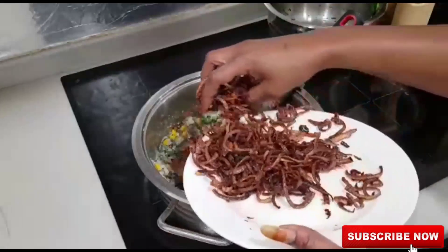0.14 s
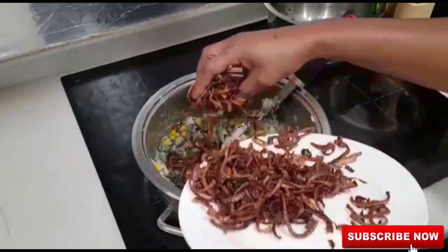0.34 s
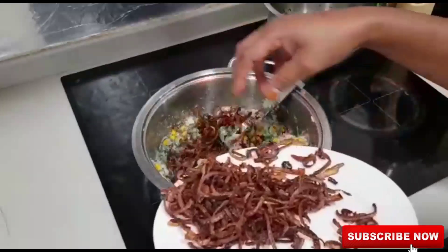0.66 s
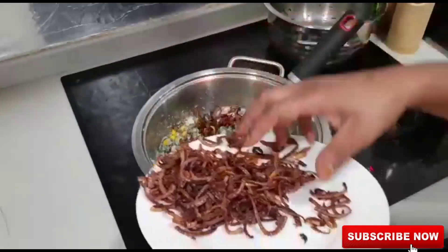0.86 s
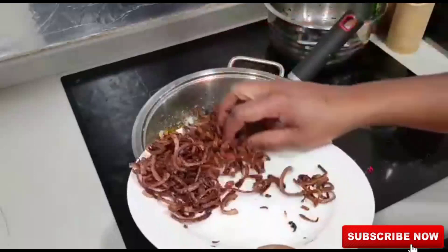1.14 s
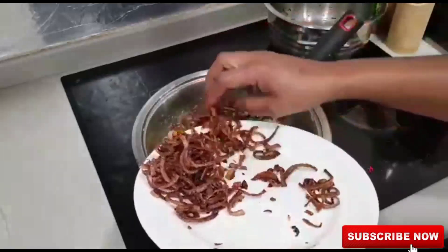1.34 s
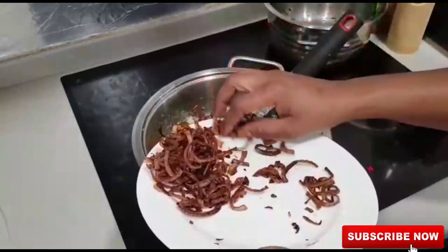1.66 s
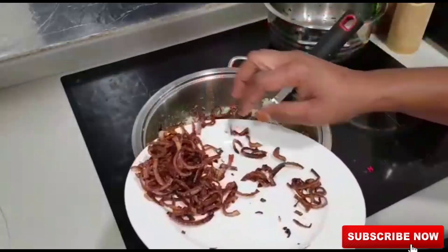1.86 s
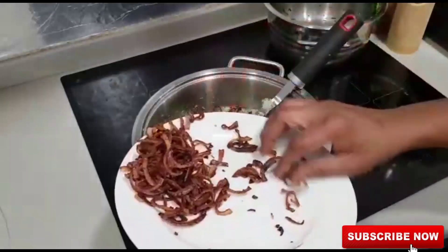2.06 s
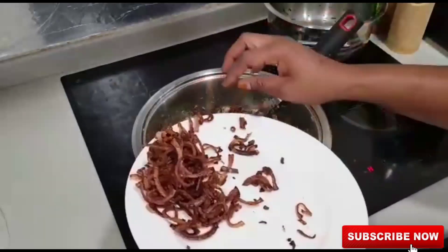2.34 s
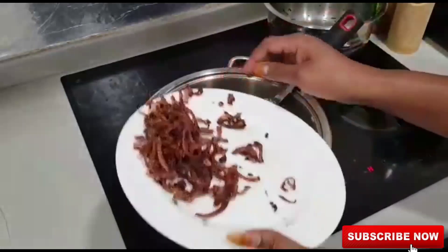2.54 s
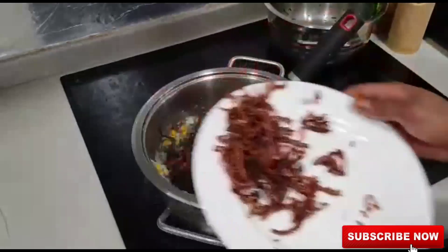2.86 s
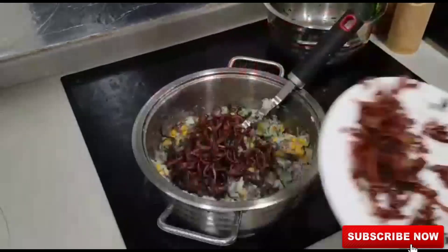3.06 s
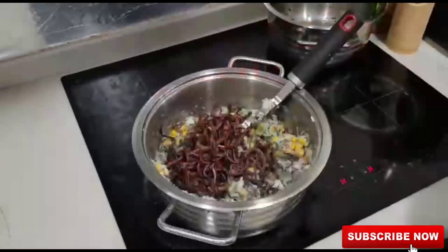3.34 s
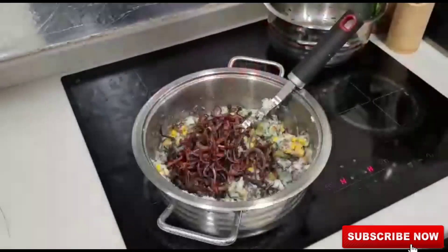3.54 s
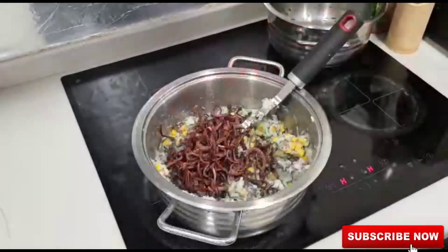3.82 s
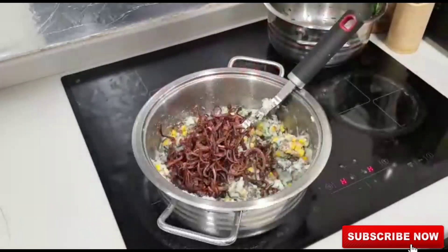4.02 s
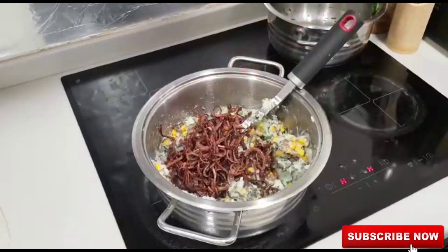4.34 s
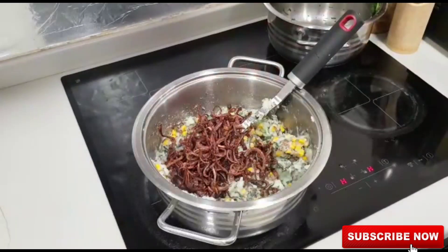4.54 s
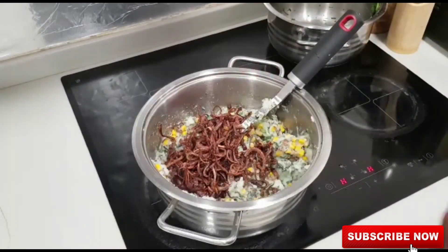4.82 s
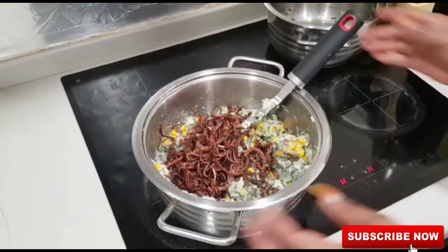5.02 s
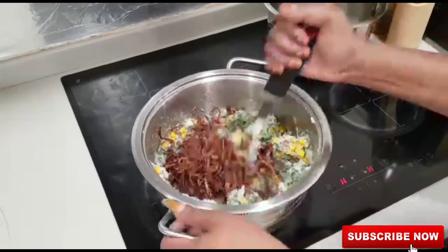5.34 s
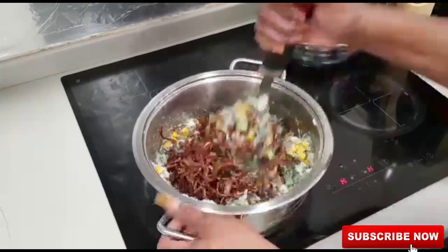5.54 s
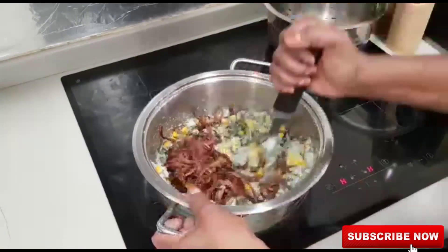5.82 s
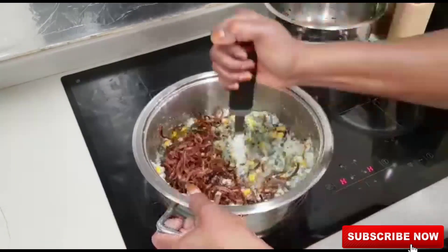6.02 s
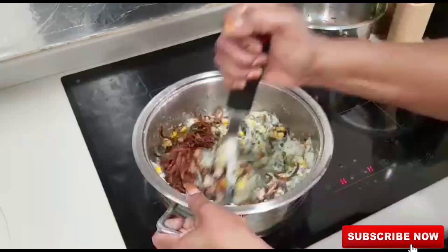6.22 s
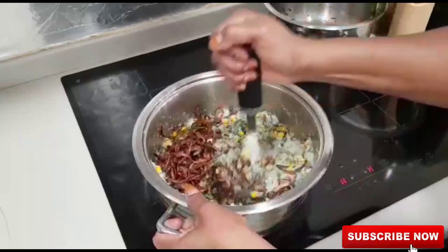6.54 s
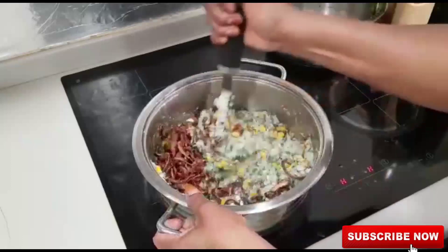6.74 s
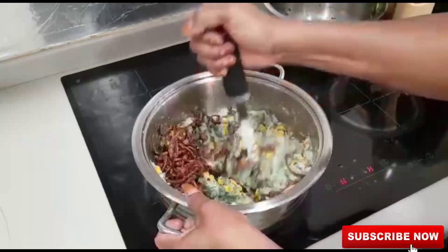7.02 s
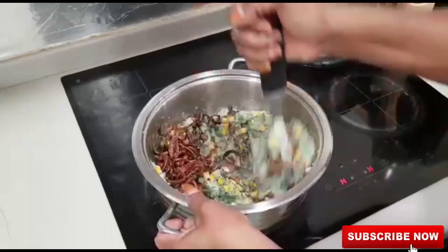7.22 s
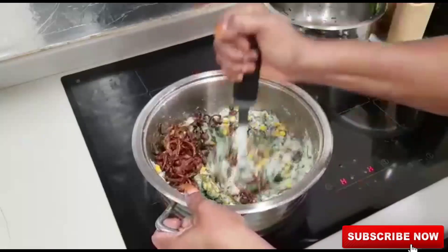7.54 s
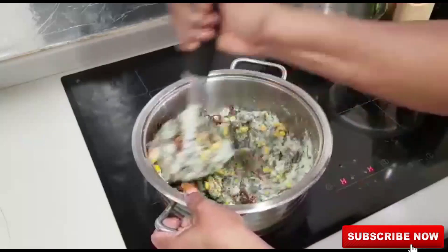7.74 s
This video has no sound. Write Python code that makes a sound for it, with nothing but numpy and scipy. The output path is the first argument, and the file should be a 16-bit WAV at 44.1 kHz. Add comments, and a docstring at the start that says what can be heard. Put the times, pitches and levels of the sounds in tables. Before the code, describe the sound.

In a small hard kitchen with a low fan rumble, fingers rake crisp fried onions off a china plate with dry crackles, snaps and bright little taps. After a lull the plate bangs onto the counter in three loud, ringing clanks. Then a steel masher squelches through soft food, with sticky pops and damped knocks on the pot. Close stereo microphones.

```python
"""Crisp fried onions are raked by hand off a china plate into a steel pot: random clicks, filtered for crackle,
also drive the plate's modes. The plate meets the counter in three clanks of shaped noise over ringing modes.
A steel masher squelches through soft food (filtered clicks, popping pockets) and knocks on the damped pot.
A fan rumbles (shaped noise, wavering tones) in a small hard kitchen; two close microphones pick it all up."""
import sys
import numpy as np
from scipy import signal
from scipy.fft import rfft, irfft
from scipy.io import wavfile
from scipy.ndimage import uniform_filter1d

SR = 44100
rng = np.random.default_rng(int(sys.argv[2]) if len(sys.argv) > 2 else 0)


def wrap_up_sound(samples):
    """Save the sound to the file named by the first command line argument, as 16-bit audio."""
    columns = np.atleast_2d(samples).T
    # keep every value between -1 and 1, then stretch to whole-number steps
    tamed = np.clip(columns, -1, 1)
    steps = np.round(tamed * 32767).astype(np.int16)
    wavfile.write(sys.argv[1], SR, steps)


N = 347508
TIME = np.arange(N) / SR
RING_TIME = TIME[:SR]

# Fingers raking onions. Each row: start in seconds, length in seconds, crackle in dB, plate ring in dB.
RAKES = [(-.02, 0.081, -43.5, -44), (.1, 0.18, -49.5, -47.5), (.28, 0.014, -49.5, -45),
         (.47, .16, -45, -66), (1.01, .05, -53, -64), (1.05, 0.27, -40.5, -41), (1.29, 0.31, -44, -51),
         (1.585, 0.014, -52.5, -44), (1.71, 0.039, -42, -44), (1.79, 0.025, -47, -45),
         (1.99, 0.026, -58, -66), (2.125, 0.088, -47, -44), (2.22, 0.044, -44, -42.5),
         (2.38, 0.057, -48, -52.5), (2.53, 0.074, -52, -50.5), (2.8, 0.68, -59.5, -75),
         (3.13, .11, -53.5, -53.5), (3.28, .17, -72, -72)]
# Strands snapping or flicking the plate. Each row: time in seconds, snap in dB, plate ring in dB.
SNAPS = [(0.192, -16.5, -13.5), (0.3042, -32, -13), (0.3673, -21.5, -16), (0.402, -17.5, -18),
         (0.4379, -17.5, -42), (1.0635, -20, -35), (1.1, -9, -37), (1.2246, -29, -12), (1.2501, -20, -12),
         (1.4666, -19, -17.5), (1.6294, -35, -37), (1.705, -29, -14.5), (1.8277, -20, -30),
         (2.1305, -8, -39), (2.2355, -14, -18), (2.3425, -19, -19), (2.3726, -20, -15), (2.593, -24, -19),
         (3.21, -29, -26), (3.8517, -32, -47)]
# Soft scuffs as the cook turns aside and back. Each row: start in seconds, length in seconds, level in dB.
SCUFFS = [(3.51, 0.18, -53.5), (4.93, 0.079, -61.5)]
# Plate meeting the counter. Each row: time in seconds, clank in dB, chatter t60 in seconds,
# counter ring in dB, china ring in dB, thud in dB, bright edge in dB.
CLANKS = [(3.963, 24.5, 0.073, 16, 3, 6, 8.5), (4.095, 21.5, 0.024, 15.5, -0.5, 6.5, -7),
          (4.328, 19.5, 0.047, 2, 9, 10, 13.5)]
# Masher pushes. Each row: start in seconds, length in seconds, squelch in dB, wet crackle in dB.
STROKES = [(5.07, .21, -66, -60.5), (5.27, 0.099, -58.5, -53), (5.36, 0.17, -47.5, -47),
           (5.68, 0.087, -60, -60), (5.81, 0.18, -48.5, -49), (6.05, 0.059, -45, -45.5),
           (6.15, 0.037, -54, -49), (6.25, 0.077, -60, -54.5), (6.305, 0.11, -39, -37),
           (6.43, 0.19, -49.5, -51), (6.575, 0.063, -45, -50), (6.73, .07, -59, -54.5),
           (6.79, 0.17, -41.5, -38.5), (7.03, 0.029, -40, -38.5), (7.42, 0.05, -43.5, -42),
           (7.55, 0.032, -36.5, -40)]
# Air pockets popping. Each row: time in seconds, tick in dB, plop in dB, pitch in Hz, pocket ring in dB.
POPS = [(5.365, -17, -42, 4400, -37), (5.49, -17, -16.5, 1040, -23), (5.705, -24.5, -47, 4200, -35),
        (6.106, -25, -21, 2860, -18), (6.4718, -22, -27, 2600, -20.5), (6.5182, -22, -42, 2060, -32),
        (6.5955, -15.5, -14.5, 1380, -13), (6.626, -30, -25.5, 1350, -16), (6.6674, -20, -35, 1240, -29),
        (6.8701, -19, -15.5, 2600, -13), (6.893, -11, -13, 1630, -13), (6.9062, -10.5, -7, 2220, -9),
        (7.1063, -15, -14, 1280, -10), (7.545, -15.5, -13.5, 4400, -18.5), (7.5744, -19, -19, 1800, -16)]
# Masher hitting the pot. Each row: time in seconds, thud in dB, pot base in dB, blade clack in dB,
# splat in dB, splat t60 in seconds, room tail in dB, left minus right in dB.
KNOCKS = [(5.761, -7, -4, -7.5, -2.5, 0.03, 1.5, 0), (6.920, 5.5, -2.5, 10, -9, 0.067, -0.5, 0.5),
          (7.3043, 0, 17, 8.5, 12.5, 0.15, 1, -0.5), (7.8596, -11, 14, 8, 10, 0.083, 9, 0)]

# China plate. Each row: frequency in Hz, relative dB touched at the rim, touched in the well,
# struck on its foot, t60 in seconds when struck.
CHINA_MODES = [(1865, -5.5, -14, -6, .2), (2127, -7.5, 1, -14, 0.23), (2823, 0.5, -4.5, -1, 0.26),
               (3390, -12, -2.5, 0.5, .38), (3428, -6, -6, -1, 0.34), (3940, -6.5, -7, -5, 0.4),
               (5125, -2.5, -6.5, -15, 0.21), (5454, -9, -6, -7.5, 0.39), (6490, -8.5, -10.5, -19, 0.2),
               (6600, -22, -14, -18, 0.45), (7795, -2, -11.5, -17.5, .22), (9870, -24, -23.5, -29.5, .2)]
# Counter top with the plate on it. Each row: frequency in Hz, relative dB, t60 in seconds.
COUNTER_MODES = [(334, -1, .3), (441, -11, .5), (487, -10, .4), (638, -8, .4), (907, -6, .35),
                 (940, -3, .45), (1006, 1, .55), (1183, -10, .4), (1385, -9, .45), (1767, -7, .35),
                 (1837, -7, .3), (1965, -6, .35), (2202, -8, .35)]
# Cupboard under the counter. Each row: frequency in Hz, relative dB, t60 in seconds.
CUPBOARD_MODES = [(65.4, -1.5, 0.7), (113, -1.5, .75), (181, -10, 0.55), (206, -6, 0.67), (268, -6.5, 0.98),
                  (309, -3, 0.48), (399, -2.5, 0.5)]
# Pot on the glass hob. Each row: frequency in Hz, relative dB, t60 in seconds.
HOB_MODES = [(69.6, 11, 0.56), (115.3, 7, 0.46), (145.6, 5.5, 0.56), (167, 6.5, 0.5), (217, 2.5, 0.38)]
# Pot base. Each row: frequency in Hz, relative dB, t60 in seconds before the food's damping.
POT_BASE_MODES = [(197, -6, 0.13), (430, -21, 0.16), (520.5, 3.5, 0.042), (601, 1, 0.021),
                  (783, 1.5, 0.039), (1020, 0.5, 0.047), (1105, -10, 0.22), (1390, -5, 0.038)]
# Pot wall under a dragging blade. Each row: frequency in Hz, relative dB, t60 in seconds.
POT_WALL_MODES = [(404, -30, 0.055), (497, 1, 0.078), (1230, 2, 0.012), (1420, 2, 0.024), (3100, -2, 0.016)]

# Crisp strands. Each row: frequency in Hz, dB per Hz.
CRISP_COLOUR = [(400, 3.5), (1000, -4.5), (2000, -1), (4000, 1), (8000, 0), (12000, 0), (16000, -3)]
# Rubbing cloth. Each row: frequency in Hz, dB per Hz.
SCUFF_COLOUR = [(300, -4.5), (800, 5), (1800, 2.5), (3000, -5.5), (8000, -13)]
# Chattering plate foot. Each row: frequency in Hz, dB per Hz.
CLANK_COLOUR = [(100, -20), (210, -14.5), (340, -8), (520, -10.5), (950, -3.5), (1250, -7), (1900, -5),
                (2600, -12.5), (3200, -20), (4000, -24), (4600, -34.5), (7000, -38.5), (9000, -49),
                (15000, -67)]
# Bright edge of a clank. Each row: frequency in Hz, dB per Hz.
EDGE_COLOUR = [(800, -3.5), (2600, 8), (3200, 0.5), (4500, -9), (7500, -21.5), (9500, -48.5), (15000, -68)]
# Squelching food. Each row: frequency in Hz, dB per Hz.
SQUELCH_COLOUR = [(100, -1), (300, -2), (520, 4.5), (850, -2), (1400, 0), (2100, -4.5), (3000, -6.5),
                  (4500, -14.5), (9000, -44.5)]
# Sticky wet crackle. Each row: frequency in Hz, dB per Hz.
WET_COLOUR = [(800, -7.5), (2500, 1.5), (4500, 2), (7000, 0), (11000, -1.5), (16000, -5.5)]
# Masher blade on steel, choked by the food. Each row: frequency in Hz, dB per Hz.
BLADE_COLOUR = [(500, -7), (1000, -11.5), (1500, -6.5), (2200, -1), (3100, -2), (3700, -15.5),
                (6000, -29.5), (15000, -34)]
# Splattering food. Each row: frequency in Hz, dB per Hz.
SPLAT_COLOUR = [(200, -15), (700, -7), (1400, 6), (2200, -15), (3700, -3.5), (4700, 0.5), (7000, -3),
                (11000, -5.5), (16000, -7)]
# Fan rumble. Each row: frequency in Hz, dB per Hz.
FAN_COLOUR = [(20, -42), (35, -25.5), (50, -11.5), (63, -3), (90, -16), (125, -8.5), (170, -14.5),
              (280, -9), (480, -17.5), (800, -26), (1500, -35), (4000, -44.5), (15000, -50)]
# Fan rumble level, in two groups of rows. Each row: time in seconds, rms level in dB.
FAN_LEVELS = [
    [(0.0, -53), (1.04, -49), (3.9, -46.5)],
    [(4.8, -50), (6.71, -52), (6.85, -47.5)],
]
# Fan motor tones. Each row: frequency in Hz, rms level in dB before the swell.
MOTOR_TONES = [(60, -62.5), (119, -61), (152, -60.5), (233, -60.5), (308, -61)]

# A rake takes hold quickly, eases as strands come free, then the heap settles.
RAKE_ATTACK_S, RAKE_SAG_DB_PER_S, RAKE_RELEASE_DB_PER_S = 0.019, 8.5, 149
# A push builds as food packs under the blade, then lets go.
PUSH_ATTACK_S, PUSH_SAG_DB_PER_S, PUSH_RELEASE_DB_PER_S = 0.038, 24, 192
SCUFF_ATTACK_S, SCUFF_SAG_DB_PER_S, SCUFF_RELEASE_DB_PER_S = 0.011, 8, 63.5
CLUMPS_PER_S, CLUMP_DB = 45, 2
# The first handful goes over the rim, later ones come up from the well, until it is half bare.
RIM_UNTIL_S, BARE_FROM_S = 0.8, 2.1
# Fingertips on bare china favour its higher modes.
BARE_DB_PER_OCTAVE, BARE_PIVOT_HZ = 4, 3000
# Level of a rim touch; how fast the holding hand chokes the plate.
RIM_TOUCH_DB, HAND_T60_S = -4.5, 0.031
CHATTER_BUILD_S = 0.021
POCKET_T60_S = 0.02
POT_LOW_CUT_HZ = 96  # the knocks carry little of the deepest bass
HUM_SWELL_DB = 2.5
MIC_SPACING_M, SOUND_M_PER_S = 0.22, 343
ROOM_T60_S, ROOM_LOW_T60_S = 0.47, 0.41
TOP_HZ = 15800


def undb(db):
    """Decibels to gain."""
    return 10 ** (np.asarray(db) / 20)


def unit(x):
    """Scale to an energy of one."""
    return x / np.sqrt(np.sum(x ** 2, axis=-1, keepdims=True))


def steady(x):
    """Scale to an rms of one."""
    return x / np.sqrt(np.mean(x ** 2))


def fade(t60_s):
    """Exponential decay, 60 dB in t60_s."""
    return np.exp(-np.log(1000) * RING_TIME / t60_s)


def gains(table, attack_s, sag_db_per_s, release_db_per_s):
    """One gain curve per dB column: each movement swells, sags while it lasts, then dies away."""
    curves = 0
    for start_s, length_s, *levels_db in table:
        age_s = np.maximum(TIME - start_s, 0)
        swell = np.sin(np.pi / 2 * np.minimum(age_s / attack_s, 1)) ** 2
        overrun_s = np.maximum(age_s - length_s, 0)
        shape = swell * undb(-sag_db_per_s * age_s - release_db_per_s * overrun_s)
        curves = np.maximum(curves, np.outer(undb(levels_db), shape))
    return curves


def clumps():
    """Uneven gain of food that catches and slips."""
    knots = np.arange(0, TIME[-1], 1 / CLUMPS_PER_S)
    return undb(CLUMP_DB * np.interp(TIME, knots, rng.standard_normal(len(knots))))


def through(x, response):
    """Pass a sound through an impulse response."""
    return signal.fftconvolve(np.atleast_2d(x), np.atleast_2d(response), axes=-1)[:, :x.shape[-1]]


def highpass(x, hz, order=2):
    """Take away what lies below hz."""
    return signal.sosfilt(signal.butter(order, hz, "high", fs=SR, output="sos"), x)


def colour(x, points, size=4096):
    """Causal minimum-phase filter with the given spectrum, by folding the cepstrum."""
    hz, db = np.transpose(points)
    bins_hz = np.maximum(np.fft.rfftfreq(size, 1 / SR), 1)
    cepstrum = irfft(np.log(undb(np.interp(np.log(bins_hz), np.log(hz), db))))
    cepstrum[1:size // 2] *= 2
    cepstrum[size // 2 + 1:] = 0
    return through(x, irfft(np.exp(rfft(cepstrum))))


def even(x, size=70):
    """Give a decaying noise an even spectrum and an energy of one."""
    spectrum = rfft(x)
    power = uniform_filter1d(np.abs(spectrum) ** 2, size, axis=-1)
    return unit(irfft(spectrum / np.sqrt(power), SR) * (RING_TIME < 0.8))


def burst(t60_s):
    """A dying rush of noise, as of tiny contacts."""
    return even(rng.standard_normal(SR) * fade(t60_s))


def grains(per_second, spread_db):
    """Random clicks of very unequal size."""
    size_db = spread_db * np.minimum(rng.exponential(size=N), 5.2)
    return (rng.random(N) < per_second / SR) * rng.choice([-1, 1], N) * undb(size_db)


def add(track, start_s, sound):
    """Mix a sound into a track from start_s."""
    start = int(start_s * SR)
    track[..., start:start + sound.shape[-1]] += sound[..., :N - start]


def ticks(table, t60_s, tail_db):
    """Sharp clicks, each with a brief crumbling tail."""
    track = np.zeros(N)
    for start_s, db in table:
        click = undb(tail_db) * burst(t60_s)
        click[0] += 1
        add(track, start_s, undb(db) * click)
    return track


def ring(modes, damping=1, spread=0):
    """Struck body at both microphones: decaying sines; spread sets short waves out of step between them."""
    sound = 0
    for hz, db, t60_s in modes:
        path_rad = min(hz * MIC_SPACING_M * 2 * np.pi / SOUND_M_PER_S, np.pi / 2)
        apart_rad = spread * path_rad * rng.choice([-1, 1])
        wave = np.sin(2 * np.pi * hz * RING_TIME + np.array([[apart_rad], [-apart_rad]]) / 2)
        sound = sound + undb(db) * rng.choice([-1, 1]) * unit(wave * fade(t60_s / damping))
    return unit(sound)


def diffuse(size):
    """Noise from all sides at two spaced microphones: alike in the bass, unrelated in the treble."""
    likeness = np.sinc(2 * np.fft.rfftfreq(size, 1 / SR) * MIC_SPACING_M / SOUND_M_PER_S)
    mid = irfft(rfft(rng.standard_normal(size)) * np.sqrt(1 + likeness), size)
    side = irfft(rfft(rng.standard_normal(size)) * np.sqrt(1 - likeness), size)
    return np.array([mid + side, mid - side]) / np.sqrt(2)


def kitchen(x, wet_db, early_db, lag_ms=0, pan_db=0):
    """Direct sound (left later by lag_ms), reflections off worktop and splashback, and the room's tail."""
    noise = diffuse(SR)
    bass = signal.sosfilt(signal.butter(2, 300, fs=SR, output="sos"), noise)
    treble = highpass(noise, 300)
    tail = unit((bass * fade(ROOM_LOW_T60_S) + treble * fade(ROOM_T60_S)) * (1 - fade(0.022)))
    early = unit(diffuse(SR) * fade(0.11) * (1 - fade(0.005)))
    response = undb(wet_db) * tail + undb(early_db) * early
    response[0, int(abs(lag_ms) * SR / 1000)] += 1
    response[1, 0] += 1
    return through(x, even(response) * undb(np.array([[pan_db], [-pan_db]]) / 2))


def scraped_china(contacts):
    """Each contact lands on another spot of the hand-held plate: random signs make each mode flicker."""
    pitches_hz, rim_db, well_db, _, _ = np.transpose(CHINA_MODES)
    tilt_db_per_octave = BARE_DB_PER_OCTAVE * (TIME > BARE_FROM_S)
    sound = 0
    for hz, rim, well in zip(pitches_hz, unit(undb(rim_db)), unit(undb(well_db))):
        share = np.where(TIME < RIM_UNTIL_S, undb(RIM_TOUCH_DB) * rim, well)
        tilt = undb(tilt_db_per_octave * np.log2(hz / BARE_PIVOT_HZ))
        drive = contacts * share * tilt * rng.choice([-1, 1], N)
        pole = np.exp((2j * np.pi * hz - np.log(1000) / HAND_T60_S) / SR)
        level = np.sqrt(2 * (1 - abs(pole) ** 2))
        sound = sound + level * signal.lfilter([1], [1, -pole], drive).imag
    return sound


def onions():
    """Each rake makes brittle strands crackle; those that scrape or flick the plate ring it."""
    crackle, scrape = gains(RAKES, RAKE_ATTACK_S, RAKE_SAG_DB_PER_S, RAKE_RELEASE_DB_PER_S) * clumps()
    crisp = crackle * steady(colour(grains(per_second=3500, spread_db=3.5), CRISP_COLOUR))
    taps = ticks([(s, db) for s, _, db in SNAPS], t60_s=0.025, tail_db=-3)
    china = scraped_china(scrape * steady(grains(per_second=700, spread_db=5.5)) + taps)
    snaps = colour(ticks([(s, db) for s, db, _ in SNAPS], t60_s=0.014, tail_db=-8), CRISP_COLOUR)
    raking = kitchen(crisp + china, wet_db=-3.5, early_db=8)
    return raking + kitchen(snaps, wet_db=-2, early_db=4.5, pan_db=-2)


def fan():
    """Low air rumble of shaped noise, with faint motor tones wavering in level and phase."""
    sound = undb(np.interp(TIME, *np.vstack(FAN_LEVELS).T)) * steady(colour(diffuse(N), FAN_COLOUR))
    knots = np.linspace(0, TIME[-1], 24)
    for hz, db in MOTOR_TONES:
        swell = np.interp(TIME, knots, rng.standard_normal(len(knots)))
        sway = np.interp(TIME, knots, rng.standard_normal(len(knots)))
        tone = np.sqrt(2) * np.sin(2 * np.pi * hz * TIME + 2.1 * sway)
        sound = sound + undb(db + HUM_SWELL_DB * swell) * tone
    return sound


def scuff():
    """Brief dull rubs of cloth: shaped noise."""
    rub = gains(SCUFFS, SCUFF_ATTACK_S, SCUFF_SAG_DB_PER_S, SCUFF_RELEASE_DB_PER_S)
    return rub * steady(colour(diffuse(N), SCUFF_COLOUR))


def plate_down():
    """The foot of the plate chatters on the counter; counter, china and cupboard ring on."""
    clatter, rings = np.zeros((1, N)), np.zeros((2, N))
    foot_modes = [(hz, db, t60_s) for hz, _, _, db, t60_s in CHINA_MODES]
    for start_s, clank_db, chatter_s, counter_db, china_db, thud_db, edge_db in CLANKS:
        chatter = burst(chatter_s) * (1 - fade(CHATTER_BUILD_S))
        add(clatter, start_s, undb(clank_db) * unit(colour(chatter, CLANK_COLOUR)))
        add(clatter, start_s, undb(edge_db) * unit(colour(burst(0.01), EDGE_COLOUR)))
        counter = undb(counter_db) * ring(COUNTER_MODES, spread=0.58)
        china = undb(china_db) * ring(foot_modes, spread=1)
        thud = undb(thud_db) * ring(CUPBOARD_MODES, spread=0.22)
        # rings build up gradually
        add(rings, start_s, (counter + china) * (1 - fade(0.0067)))
        add(rings, start_s, thud * (1 - fade(0.1)))
    return kitchen(highpass(clatter, 70), wet_db=5.5, early_db=5.5, lag_ms=0.51) + rings


def pockets():
    """Each air pocket rings for an instant at its own pitch as it bursts."""
    track = np.zeros((1, N))
    for start_s, _, _, hz, db in POPS:
        add(track, start_s, undb(db) * unit(np.sin(2 * np.pi * hz * RING_TIME) * fade(POCKET_T60_S)))
    return track


def mash():
    """The blade squeezes wet food along the pot: dull squelches, wall drag, sticky crackle, pops."""
    push, stick = gains(STROKES, PUSH_ATTACK_S, PUSH_SAG_DB_PER_S, PUSH_RELEASE_DB_PER_S) * clumps()
    squelch = push * steady(colour(grains(per_second=1500, spread_db=3.5), SQUELCH_COLOUR))
    # firm pushes drag the steel disproportionately harder
    drag_gain = undb(-5) * push * np.sqrt(push / push.max())
    wall = through(grains(per_second=970, spread_db=6), ring(POT_WALL_MODES))[0]
    drag = drag_gain * steady(wall)
    wet = stick * steady(colour(grains(per_second=3200, spread_db=4), WET_COLOUR))
    plops = colour(ticks([(s, db) for s, _, db, *_ in POPS], t60_s=0.035, tail_db=9.5), SQUELCH_COLOUR)
    clicks = colour(ticks([(s, db) for s, db, *_ in POPS], t60_s=0.017, tail_db=2), WET_COLOUR)
    food = squelch + drag + wet + pockets() + plops
    return kitchen(food, wet_db=-6.5, early_db=3.5) + kitchen(clicks, wet_db=3, early_db=6.5)


def knocks():
    """The masher breaks through to steel: hob thuds, base rings briefly, blade clacks, food splats."""
    track = np.zeros((2, N))
    for start_s, thud_db, base_db, blade_db, splat_db, splat_s, room_db, pan_db in KNOCKS:
        base = undb(base_db) * ring(POT_BASE_MODES, damping=2)
        clack = undb(blade_db) * unit(colour(burst(0.029), BLADE_COLOUR))
        spray = burst(0.01) + undb(8.5) * burst(splat_s)
        splat = undb(splat_db) * unit(colour(spray, SPLAT_COLOUR))
        hit = highpass(base + clack + splat, POT_LOW_CUT_HZ)
        add(track, start_s, kitchen(hit, wet_db=room_db, early_db=5, pan_db=pan_db))
        add(track, start_s, undb(thud_db) * ring(HOB_MODES, spread=0.47) * (1 - fade(0.015)))
    return track


def scene():
    """Everything heard from above the hob."""
    return onions() + fan() + scuff() + plate_down() + mash() + knocks()


def record(dry):
    """The recorder clips at full scale and cuts the top."""
    top_cut = signal.ellip(10, 0.2, 70, TOP_HZ, fs=SR, output="sos")
    return signal.sosfilt(top_cut, np.clip(dry, -1, 1))


dry = scene()
out = record(dry)
wrap_up_sound(out)
```